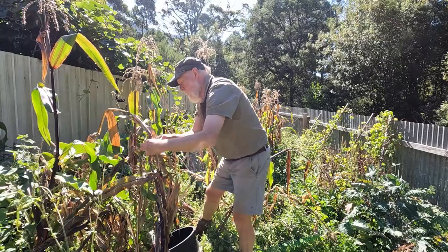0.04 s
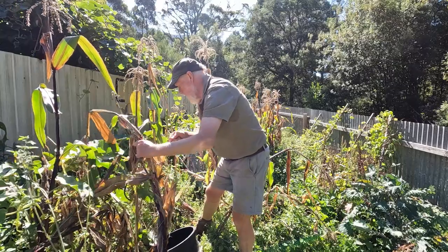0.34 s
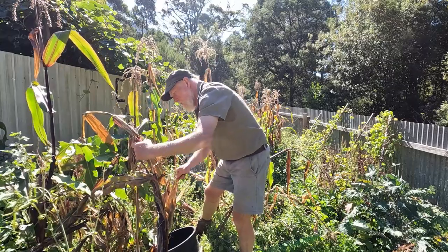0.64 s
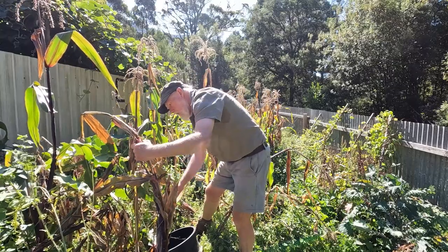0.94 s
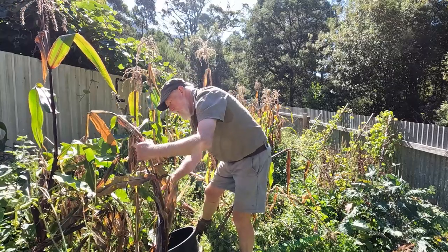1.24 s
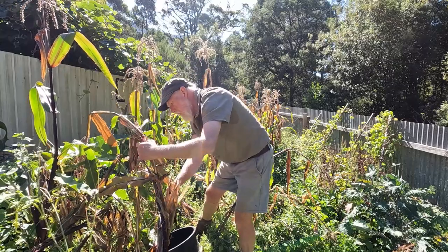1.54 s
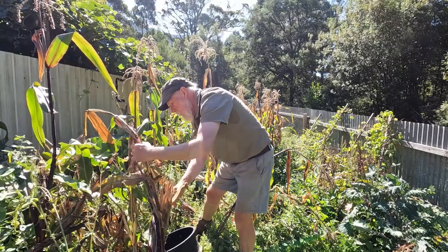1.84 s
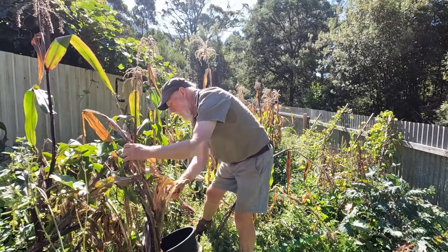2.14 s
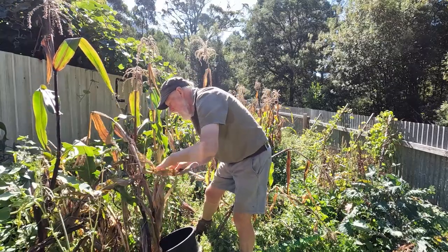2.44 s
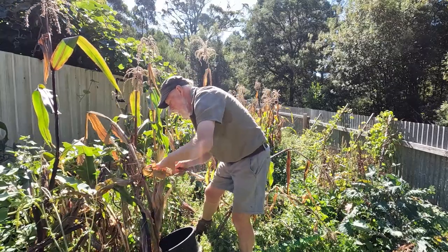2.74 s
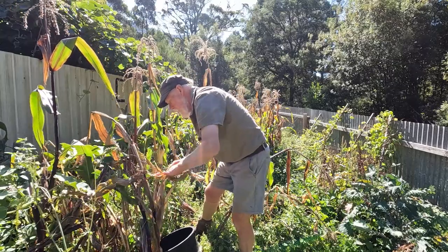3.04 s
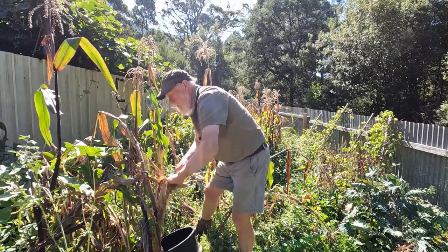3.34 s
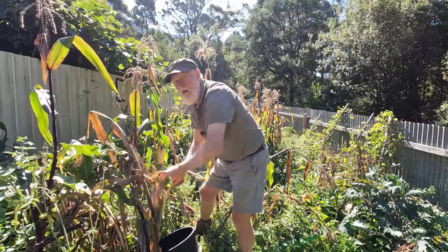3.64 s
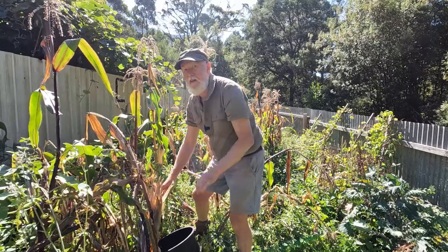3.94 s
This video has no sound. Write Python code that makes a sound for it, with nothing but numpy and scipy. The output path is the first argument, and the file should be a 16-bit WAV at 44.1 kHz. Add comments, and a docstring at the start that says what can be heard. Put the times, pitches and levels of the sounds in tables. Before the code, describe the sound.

Crackling dry corn husks are torn by hand outdoors, and something drops into a plastic bucket.

```python
"""Dry corn husks are pulled apart by hand, a few steps away in a quiet garden.
Countless tiny fractures make the rustle; single stiff leaves snap out of it, the stalk bumps dully
and husk squeaks on husk. After a second something drops into a plastic bucket, knocks once
and settles with a couple of woody ticks and two soft bumps."""
import sys
import numpy as np
from scipy import signal
from scipy.fft import rfft, irfft
from scipy.io import wavfile
from scipy.ndimage import uniform_filter1d

SR = 44100
rng = np.random.default_rng(int(sys.argv[2]) if len(sys.argv) > 2 else 0)


def log_audio(samples):
    """Write samples as a 16-bit WAV file to the path given in sys.argv[1]."""
    # one column per channel
    frames = np.atleast_2d(samples).T
    # limit to full scale, then quantise
    limited = np.clip(frames, -1, 1)
    pcm = np.round(limited * 32767).astype(np.int16)
    wavfile.write(sys.argv[1], SR, pcm)


N = 176400

# Tone of a dry crack. Each row: frequency in Hz, level in dB.
CRACK_SPECTRUM = [(120, -45), (300, -13.5), (2500, -3.5), (4500, -6), (8500, -14), (10800, -18.5),
                  (13500, -38.5)]
# Dull body of the stalk. Each row: frequency in Hz, level in dB.
STALK_SPECTRUM = [(60, -17.5), (170, -3.5), (350, 2.5), (1100, -0.5), (6000, -16.5), (13500, -33)]


def amp(db):
    """Decibels to gain."""
    return 10 ** (np.asarray(db) / 20)


def unit_rms(x):
    """Scales to rms 1."""
    return x / np.sqrt(np.mean(x ** 2) + 1e-20)


def unit_energy(x):
    """Scales to energy 1."""
    return x / np.sqrt(np.sum(x ** 2) + 1e-20)


def add(mix, start_s, sound):
    """Mixes a sound in at a time."""
    part = mix[max(round(start_s * SR), 0):][:len(sound)]
    part += sound[:len(part)]


def colour(x, spectrum, size=2048):
    """Minimum-phase EQ through (Hz, dB) points."""
    f, db = np.transpose(spectrum)
    hz = abs(np.fft.fftfreq(size, 1 / SR))
    log_gain = np.log(amp(np.interp(np.log(hz + 1), np.log(f), db)))
    impulse = np.fft.ifft(np.exp(np.conj(signal.hilbert(log_gain)))).real
    return signal.oaconvolve(x, impulse[:size // 2])[:len(x)]


def wander(hz):
    """Random drift of rms 1, rolling off above the given rate."""
    f = np.fft.rfftfreq(N, 1 / SR)
    return unit_rms(irfft(rfft(rng.standard_normal(N)) * f / (f + hz / 10) / (1 + (f / hz) ** 2), N))


def ring(x, hz, q):
    """One resonance of gain 1."""
    return signal.lfilter(*signal.iirpeak(min(hz, SR / 3), max(q, 1), SR), x)


def effort_db():
    """How hard the hands work the leaves at every sample."""
    # Each row: time in seconds, level in dB.
    handling = [(0, -31.5), (.075, -32.5), (0.109, -28), (.18, -36.5), (.25, -28), (.36, -29), (.46, -38.5),
                (.55, -38.5), (.6, -43), (.74, -41), (.92, -51.5), (1.15, -47.5), (1.456, -56),
                (1.464, -43.5), (1.53, -35), (1.61, -37), (1.85, -41), (1.96, -34.5), (2.15, -38.5),
                (2.215, -30), (2.47, -29.5), (2.57, -31.5), (2.61, -37.5), (2.768, -28.5), (2.851, -38),
                (2.94, -31), (2.98, -39.5), (3.02, -33.5), (3.15, -39), (3.34, -40), (3.39, -32.5),
                (3.44, -29.5), (3.49, -34), (3.62, -35), (3.67, -30), (3.72, -35.5), (3.882, -36),
                (3.924, -51), (4, -33.5)]
    return np.interp(np.arange(N) / SR, *np.transpose(handling))


def husk_rustle(scraps=24, peak_fractures_per_s=8000, ring_cycles=2.5):
    """Tiny fractures ring scraps of leaf; gentle handling thins them out."""
    effort = effort_db()
    activity = amp(.3 * (effort - effort.max()))
    size_db = 2.5 * np.minimum(rng.exponential(1, N), 5)
    sizes = amp(size_db) * rng.choice([-1, 1], N) / np.sqrt(activity)
    clicks = sizes * (rng.random(N) < activity * peak_fractures_per_s / SR)
    scrap_hit = rng.integers(0, scraps, N)
    rings = np.zeros(N)
    for k, hz in enumerate(np.geomspace(700, 12000, scraps)):
        prominence = amp(3 * wander(hz=24.8))  # the scraps take turns
        rings += ring(clicks * (scrap_hit == k) * prominence, hz, np.pi * ring_cycles) / np.sqrt(hz)
    crackle = colour(unit_rms(rings) + unit_rms(clicks), leaf_tone())
    clumps = amp(1.53 * wander(hz=83))
    return unit_rms(crackle * clumps) * amp(effort + 1.5)


def leaf_tone():
    """Dry leaves sound papery, strongest near 3 kHz."""
    # Each row: frequency in Hz, level in dB.
    leaf_spectrum = [(100, -23), (170, -44), (330, -19), (550, -17), (1200, -8), (2800, 2), (4000, 1),
                     (5200, -2.5), (8300, -14.5), (10900, -18.5), (11800, -26), (13500, -27)]
    return leaf_spectrum


def stalk_brushing():
    """Whole leaves and the stalk bump dully as the plant is moved."""
    body = colour(rng.standard_normal(N), STALK_SPECTRUM)
    bumps = unit_rms(body * amp(2.5 * wander(hz=41)))
    return bumps * amp(-24 + 0.61 * effort_db())


def garden_air(level_db=-56):
    """A faint, steady bed of outdoor noise."""
    # Each row: frequency in Hz, level in dB.
    air_spectrum = [(30, -27), (320, -2), (4000, -17), (13500, -35)]
    return amp(level_db) * unit_rms(colour(rng.standard_normal(N), air_spectrum))


def leaf_snap(db, hz, tear_s, thump_db, fizz_hz=9630, size=4096):
    """A crack and a dying run of smaller ones ring the leaf and jolt the stalk."""
    t = np.arange(size) / SR
    tear = unit_energy(rng.laplace(size=size) * np.exp(-t / tear_s))
    fractures = tear + 0.11 * signal.unit_impulse(size)
    crack = unit_energy(colour(fractures, CRACK_SPECTRUM))
    leaf = unit_energy(crack + amp(6) * unit_energy(ring(crack, hz, q=1.46)))
    fizz = unit_energy(ring(ring(fractures, fizz_hz, q=5.6), fizz_hz, q=1))
    fizz *= amp(-15.5) * (hz / 4000) ** 2  # thin, high leaves fizz most
    jolt = rng.standard_normal(size) * np.exp(-t / 0.0063)
    thump = amp(thump_db) * unit_energy(colour(jolt, STALK_SPECTRUM))
    return amp(db - 1.5) * np.sqrt(SR * tear_s / 2) * (leaf + fizz + thump)


def bucket_knock(db, bright_hz, clatter_s=0.011, hard_hz=1010, size=16384):
    """A blow rings the bucket; soft blows reach mainly its low modes, hard ones also clatter."""
    # The bucket's modes. Each row: pitch in Hz, level in dB, time to fall 60 dB in seconds.
    bucket_modes = [(268, -4.5, 0.093), (317.3, 0.5, 0.16), (395, -9, .12), (842, 2.5, 0.06),
                    (970, -5, 0.1), (1225, 2, 0.12), (1420, 13, 0.014), (1660, -16, .07), (1970, 6, 0.021)]
    # Rough contact with its wall. Each row: frequency in Hz, level in dB.
    contact_spectrum = [(70, -26), (200, 4.5), (1450, 0.5), (3000, -6.5), (6000, -10), (12000, -28)]
    t = np.arange(size) / SR
    body = np.zeros(size)
    for k, (hz, level, t60) in enumerate(bucket_modes):
        mode = amp(level - 60 * t / t60) * np.sin(2 * np.pi * hz * t)
        body += (-1) ** k * mode / (1 + (hz / bright_hz) ** 2)
    contact = rng.standard_normal(size) * np.exp(-t / clatter_s)
    clatter = colour(contact, contact_spectrum) / (1 + (hard_hz / bright_hz) ** 2)
    return amp(db) * (.5 * body + amp(7) * clatter)


def woody_tick(db, hz=1900, q=2.2, decay_s=0.0016, size=2048):
    """A light blow on something hard and woody gives a short, hollow tick."""
    blow = rng.standard_normal(size) * np.exp(-np.arange(size) / SR / decay_s)
    hollow = unit_energy(ring(ring(blow, hz, q), hz, q))
    click = unit_energy(colour(blow, CRACK_SPECTRUM))
    return amp(db) * (hollow + 0.33 * click)


def husk_squeak(db, hz, rise_s, q=5.7, size=4096):
    """Husk slides on husk: a quick swell of slips rings one stiff leaf."""
    age = np.arange(size) / SR / rise_s
    slips = rng.standard_normal(size) * age * np.exp(-age)
    tone = unit_energy(ring(ring(slips, hz, q / 2), hz, q))
    rasp = unit_energy(colour(slips, CRACK_SPECTRUM))
    return amp(db) * np.sqrt(2 * SR * rise_s) * (tone + 0.057 * rasp)


def garden_reflections(x, wet_db=-10.5, t60_s=0.094, echoes_per_s=2000, size=11025):
    """Ground, fence and foliage scatter back a short, thin tail."""
    t = np.arange(size) / SR
    echoes = rng.standard_normal(size) * (rng.random(size) < echoes_per_s / SR)
    tail = unit_energy(echoes * (t > .002) * amp(-60 * t / t60_s))
    return x + amp(wet_db) * signal.oaconvolve(x, tail)[:N]


def diffuse_hiss(x):
    """A faint hiss that follows the sound's level and differs between the two channels."""
    # Each row: frequency in Hz, level in dB.
    side_spectrum = [(300, -29), (2000, -52.5), (5000, -37), (13500, -28.5)]
    envelope = np.sqrt(abs(uniform_filter1d(x ** 2, 256)))
    return colour(envelope * rng.standard_normal(N), side_spectrum)


def scene():
    """Husks and bucket sit straight ahead; a faint hiss differs between the two channels."""
    # Each row: start in seconds, strength in dB, ring in Hz, tearing time in seconds, thump in dB.
    snaps = [(.022, -23, 3530, 0.018, -32), (.1412, -17.5, 2300, 0.0014, -24),
             (.2755, -15.5, 2130, 0.0056, -12), (.2965, -15, 2520, 0.011, -14),
             (.3268, -9.5, 3820, 0.0014, -9), (.333, -15, 2480, 0.01, -12.5),
             (.381, -21, 2840, 0.0053, -12.5), (.56, -19, 2540, 0.0034, -18),
             (1.105, -28, 3200, 0.0021, -31), (1.533, -26.5, 3620, 0.0078, -7.5),
             (1.587, -26, 4000, 0.007, -8.5), (1.717, -22.5, 3180, 0.013, -10.5),
             (1.922, -24.5, 4000, 0.0033, -25), (2.1, -18.5, 3330, 0.0047, -31),
             (2.2005, -15.5, 3500, 0.0033, -19), (2.44, -10, 3400, 0.0042, -11),
             (2.569, -16, 2830, 0.011, -12.5), (2.638, -15, 2700, 0.0039, -20),
             (2.749, -12.5, 3600, 0.0039, -14), (2.93, -16, 3870, 0.002, -16),
             (3.096, -27, 7300, 0.0032, -15), (3.2, -21, 4500, 0.0063, -17),
             (3.345, -25, 4000, 0.019, -34.5), (3.386, -21.5, 4400, 0.0091, -12),
             (3.432, -12.5, 4800, 0.003, -17.5), (3.457, -16, 3440, 0.0075, -12),
             (3.472, -18.5, 3500, 0.0045, -9)]
    # Each row: start in seconds, strength in dB, pitch in Hz, rise time in seconds.
    squeaks = [(2.365, -14.5, 3560, 0.0026), (2.94, -25, 2570, 0.0031), (2.997, -32, 2520, 0.021),
               (3.966, -29, 2020, 0.0014)]
    # Each row: start in seconds, strength in dB, brightness in Hz.
    knocks = [(1.009, -19, 2980), (1.0215, -23.5, 340), (1.197, -26.5, 300), (1.266, -29, 300),
              (1.283, -26.5, 310)]
    # Each row: start in seconds, strength in dB.
    ticks = [(1.1355, -8), (1.1505, -14)]
    direct = husk_rustle() + stalk_brushing()
    cues = (snaps, leaf_snap), (squeaks, husk_squeak), (knocks, bucket_knock), (ticks, woody_tick)
    for events, source in cues:
        for start_s, *settings in events:
            add(direct, start_s, source(*settings))
    mid = garden_reflections(direct) + garden_air()
    side = diffuse_hiss(mid)
    return np.array([mid + side, mid - side])


def record(dry, low_cut_hz=164, notch_hz=8930, notch_width_hz=1200, sheen_hz=10820, top_hz=13700):
    """The microphone's partial low cut, treble notch and sheen, then the band limit."""
    low_cut = signal.butter(6, low_cut_hz, "high", fs=SR, output="sos")
    thinned = signal.sosfilt(low_cut, dry) + 0.13 * dry
    notched = signal.lfilter(*signal.iirnotch(notch_hz, notch_hz / notch_width_hz, SR), thinned)
    bright = notched + ring(notched, sheen_hz, q=28)
    band_limit = signal.firwin(255, top_hz, window=("kaiser", 9), fs=SR)
    return signal.oaconvolve(bright, band_limit[None], "same")


dry = scene()
out = record(dry)
log_audio(out)
```